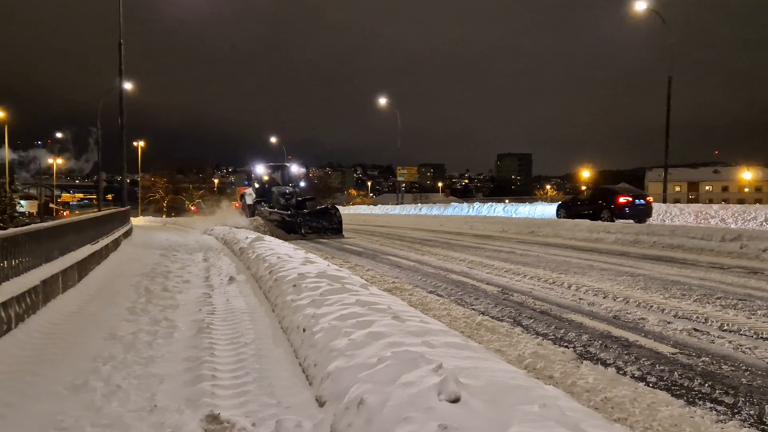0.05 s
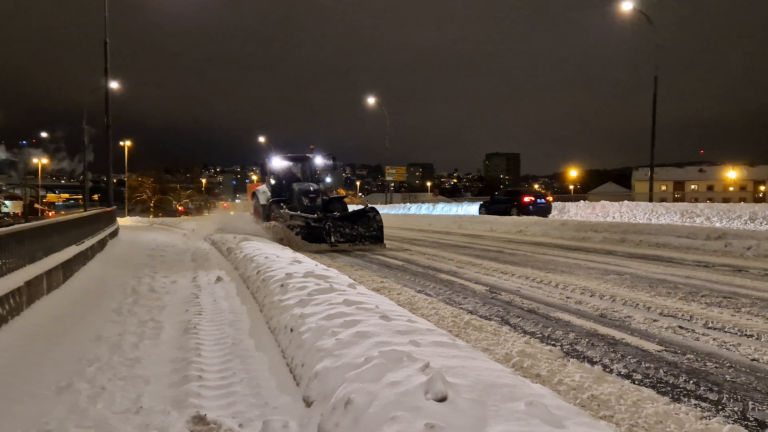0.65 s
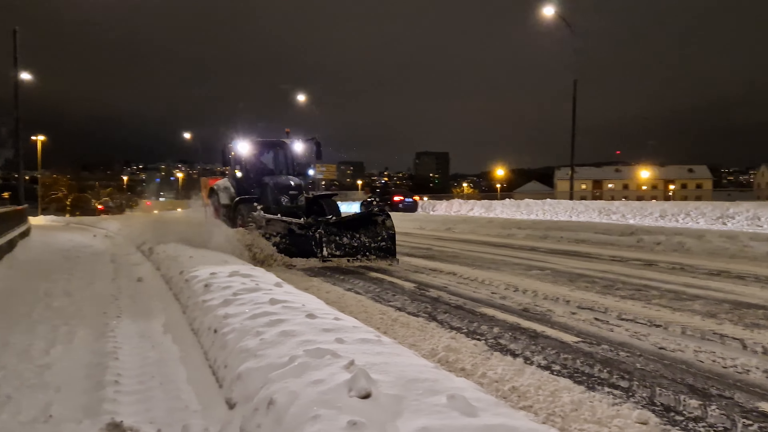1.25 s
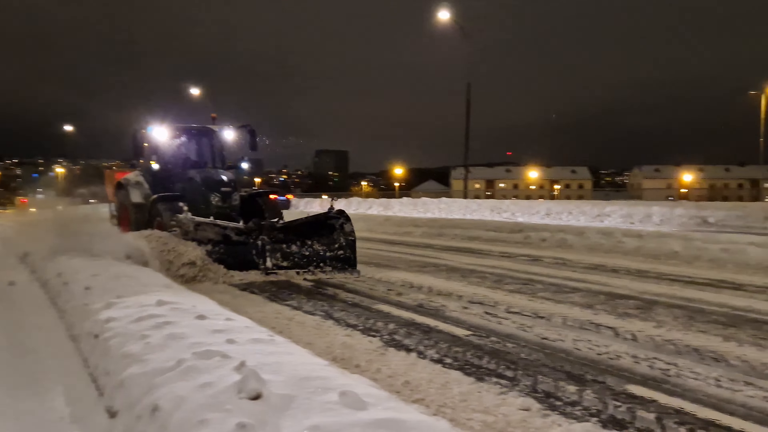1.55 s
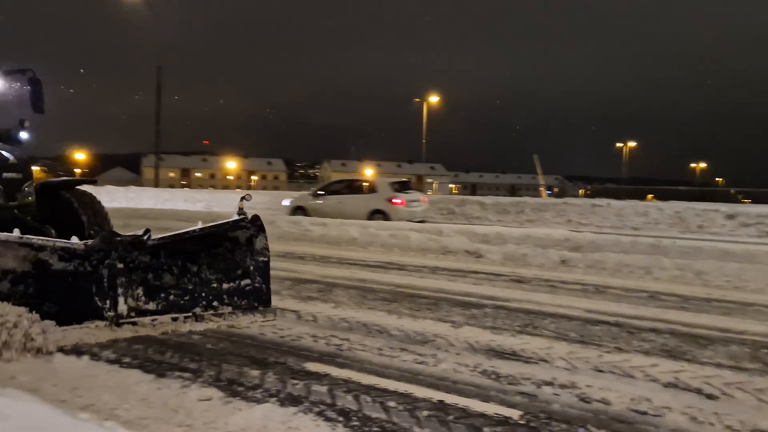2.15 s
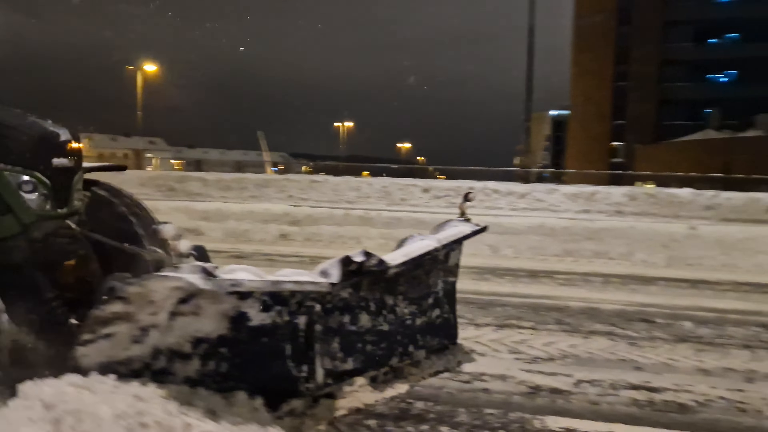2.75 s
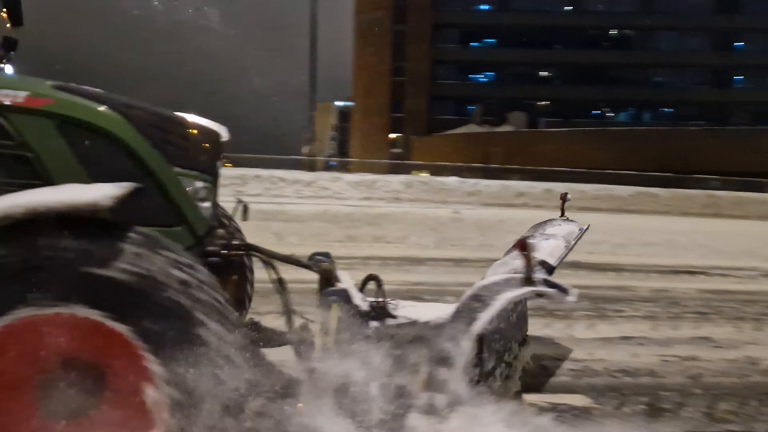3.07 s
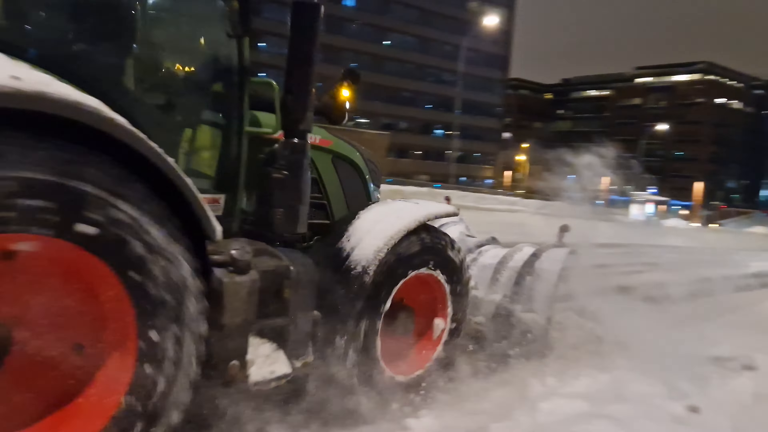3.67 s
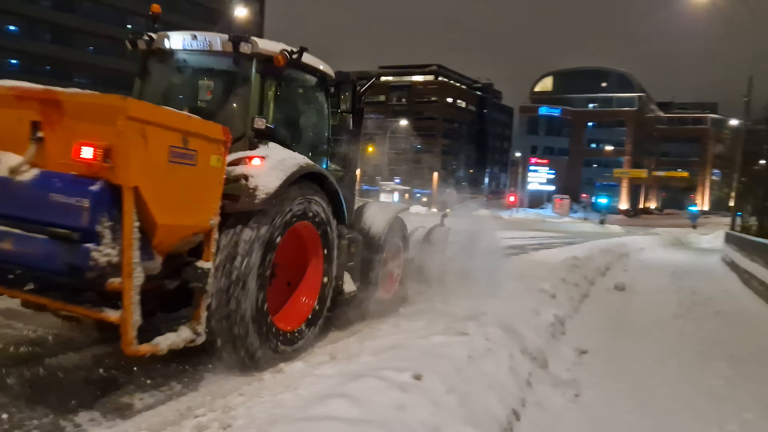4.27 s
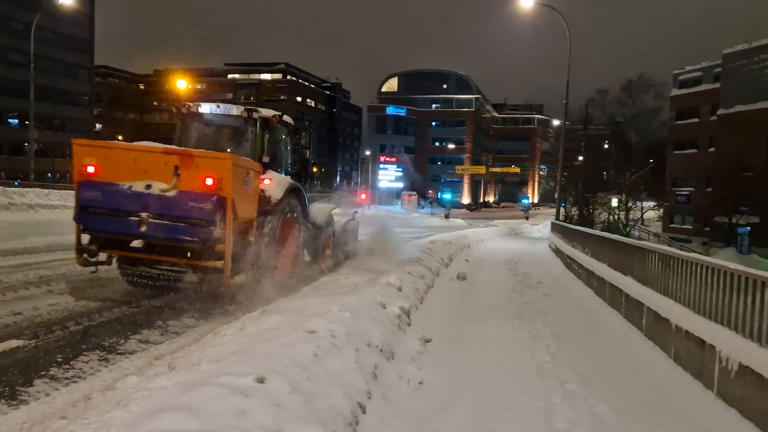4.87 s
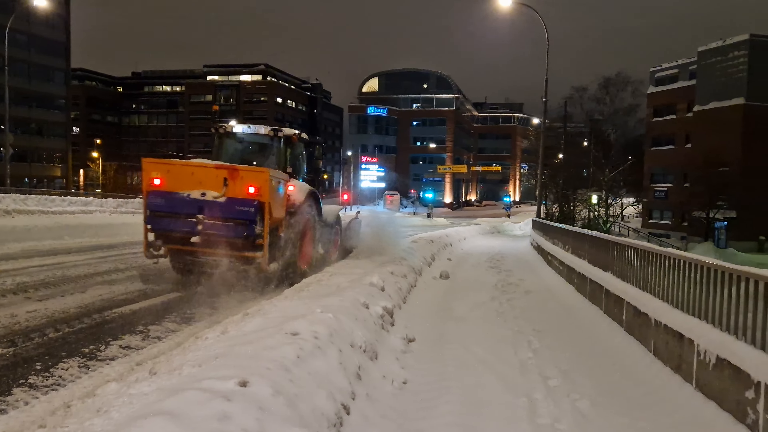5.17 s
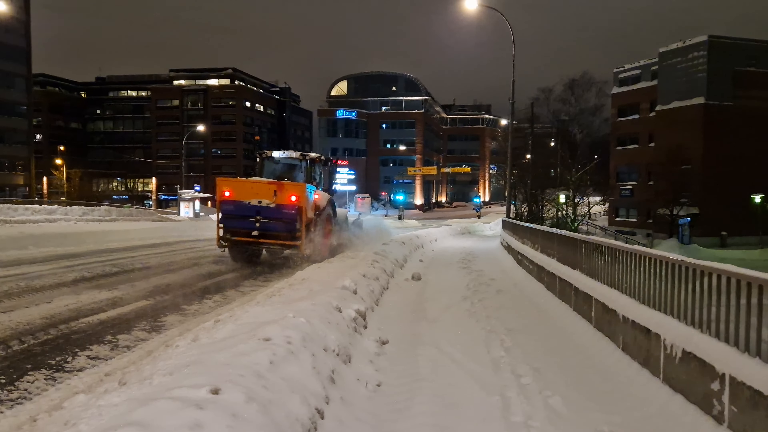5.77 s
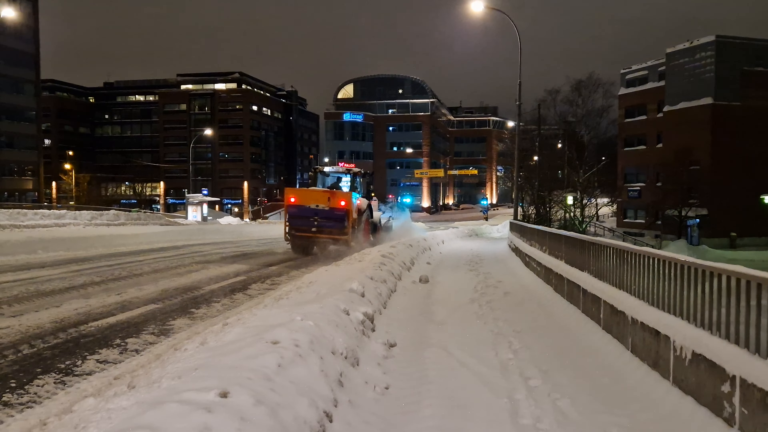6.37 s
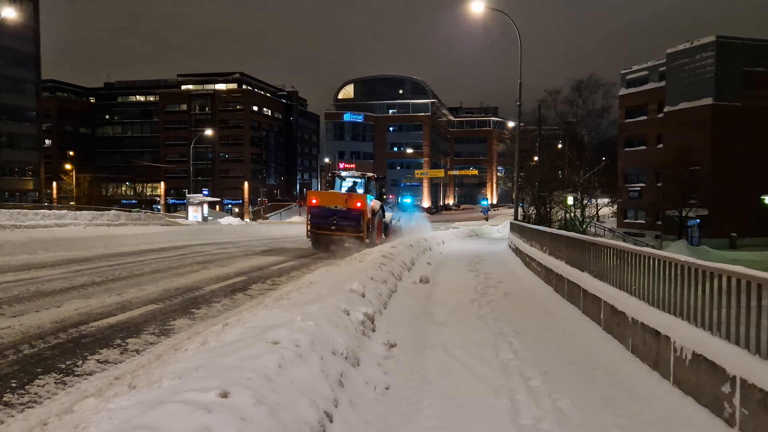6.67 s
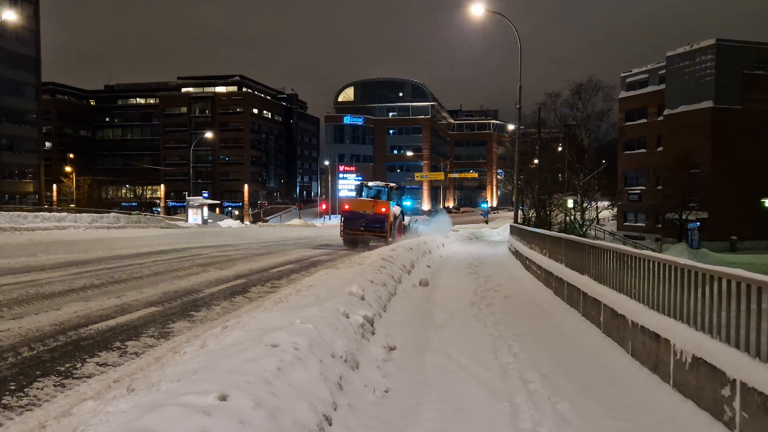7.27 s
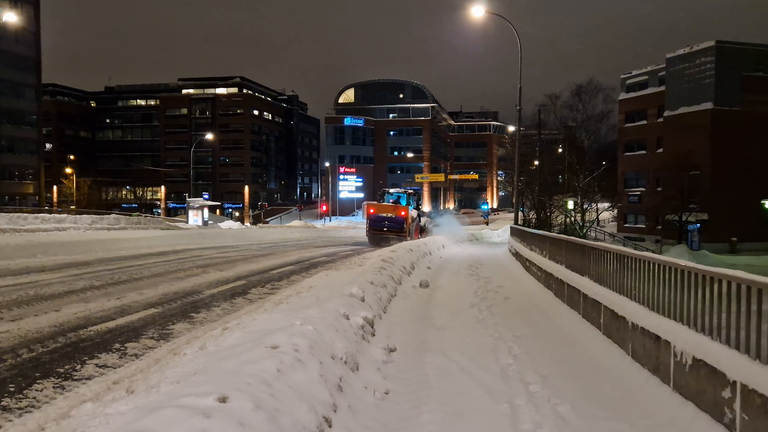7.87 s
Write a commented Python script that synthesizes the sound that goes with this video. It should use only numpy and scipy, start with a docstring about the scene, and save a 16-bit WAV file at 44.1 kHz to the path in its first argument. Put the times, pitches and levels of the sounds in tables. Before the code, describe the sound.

A diesel tractor passes close with its plough blade scraping and booming over packed snow, spraying snow, then draws away.

```python
"""A diesel tractor with a steel plough passes close by a stereo pair at the side of a snowy road.
On the approach the edge screeches and catches on ice, under a thin, sinking whistle.
Two to three seconds in it is closest: the blade judders and rasps over packed snow and booms at its own
resonance, lugged tyres rumble and thrown snow hisses. From about five seconds it draws away,
leaving the exhaust, the whine of the drive train and a far-off rumble."""
import sys
import numpy as np
from scipy import signal
from scipy.fft import rfft, irfft, next_fast_len
from scipy.io import wavfile
from scipy.ndimage import uniform_filter1d, minimum_filter1d, map_coordinates

SR = 44100
rng = np.random.default_rng(int(sys.argv[2]) if len(sys.argv) > 2 else 0)


def pcm_store(signal):
    """Save signal as 16-bit PCM."""
    levels = np.round(np.clip(np.atleast_2d(signal), -1, 1) * 32767)
    wavfile.write(sys.argv[1], SR, levels.astype(np.int16).T)


N = 349269
TIME = np.arange(N) / SR


def amp(db):
    """Decibels to gain."""
    return 10 ** (np.asarray(db) / 20)


def unit(x):
    """Scale to rms 1."""
    return x / np.sqrt(np.mean(x ** 2) + 1e-20)


def noise():
    """Two unrelated white noises."""
    return rng.standard_normal((2, N))


def along(points, hz):
    """Interpolate (f/Hz, value) points on a log frequency axis."""
    f, v = np.transpose(points)
    return np.interp(np.log(hz + 1), np.log(f + 1), v)


def curves(rows):
    """One value per sample for each column after the time."""
    s, *cols = np.transpose(rows)
    return [np.interp(TIME, s, c) for c in cols]


def wobble(rate):
    """A smooth random curve, rate knots a second."""
    steps = np.linspace(0, N / SR, N // 32)
    knots = rng.standard_normal(int(N * rate / SR) + 4)
    return np.interp(TIME, steps, map_coordinates(knots, [steps * rate]))


def spells(rows, ramp_s):
    """Gain in dB of (t/s, length/s, gain/dB) events that ramp in, hold and ramp out."""
    return sum(db * (np.tanh((TIME - s) / ramp_s) - np.tanh((TIME - s - length) / ramp_s)) / 2
               for s, length, db in rows)


def swells(rows, width_s):
    """Gain in dB of brief (t/s, gain/dB) events that swell and fade."""
    return sum(db * np.exp(-((TIME - s) / width_s) ** 2) for s, db in rows)


def passing(loudest_s, peak_db, round_s, rise_db_per_s, fall_db_per_s, far_db):
    """Roadside level in dB of a pass: a steady rise, a rounded peak, a fall to the far-off level."""
    away_s = np.hypot(TIME - loudest_s, round_s) - abs(round_s)
    db = peak_db - away_s * np.where(TIME < loudest_s, rise_db_per_s, fall_db_per_s)
    return 20 * np.log10(np.hypot(amp(db), amp(far_db)))


def filtered(x, response):
    """x times a response of frequency."""
    m = next_fast_len(N + SR // 2)
    return irfft(rfft(x, m) * response(np.fft.rfftfreq(m, 1 / SR)), m)[..., :N]


def shaped(x, spectrum):
    """x through a (f/Hz, gain/dB) curve."""
    return filtered(x, lambda hz: amp(along(spectrum, hz)))


def turning(pair, spectra, view):
    """Crossfade through the spectra, each at rms 1, as view goes 0, 1, 2."""
    return sum(np.maximum(1 - abs(view - k), 0) * unit(shaped(pair, spectrum))
               for k, spectrum in enumerate(spectra))


def grains(rate, scatter_db, bed_db):
    """Tiny random impacts of uneven size, rate a second, in a bed of countless weaker ones."""
    strikes = rng.random((2, N)) < rate / SR
    sizes = np.clip(noise() * amp(scatter_db * noise()), -3, 3)
    return unit(unit(strikes * sizes) + amp(bed_db) * noise())


def rippled(pair, depth_db):
    """Narrow patches of the spectrum swell and fade at random, rippling the noise."""
    bins = signal.stft(pair, nperseg=2048)[2]
    patches = uniform_filter1d(rng.standard_normal(bins.shape[1:]), size=2, axis=0)
    patches = uniform_filter1d(patches, size=18, axis=1)
    return signal.istft(bins * amp(depth_db * unit(patches)))[1][:, :N]


def ringing(drive, hz, width_hz, steady):
    """A resonance with a gliding centre, kept ringing by the drive; steady 0-1 evens out its swing."""
    turn = np.exp(2j * np.pi * np.cumsum(hz) / SR)
    pole = np.exp(-np.pi * width_hz / SR)
    swing = signal.lfilter([1 - pole], [1, -pole], drive / turn)
    swing = signal.lfilter([1 - pole], [1, -pole], swing)
    strength = uniform_filter1d(unit(abs(swing)), size=6000) + .1
    return unit((swing * turn).real / strength ** steady)


def tone(rows, width_hz):
    """A fuzzy note on a (t/s, f/Hz, level/dB) path, fading beyond its ends."""
    hz, db = curves(rows)
    outside_s = np.maximum(rows[0][0] - TIME, 0) + np.maximum(TIME - rows[-1][0], 0)
    return amp(db - 60 * outside_s) * ringing(noise(), hz, width_hz, steady=0.71)


# The side of the machine facing the microphones: t/s, view (0 = front, 1 = flank, 2 = rear)
VIEW = [(1.7, 0.18), (2.7, 0.94), (4.2, 1.09), (5.1, 1.16)]
def machine_view():
    """The machine is heard head on, then side on, then slightly from behind."""
    return curves(VIEW)[0]


# Brief flares of the whistle: t/s, gain/dB
WHISTLE_FLARES = [(.97, 4), (1.28, 10), (1.74, 7), (2.37, 1), (2.49, 4)]
def whistle():
    """A thin, flickering whistle sinks and grows on the approach, and dies as the machine draws level."""
    hz = 16320 - 1990 * TIME
    db = -65 + 3 * TIME - 90 * np.maximum(TIME - 2.55, 0)
    db = db + swells(WHISTLE_FLARES, width_s=0.061) + 3 * wobble(45)
    return amp(db) * ringing(noise(), hz, width_hz=300, steady=0.99)


# Firing rate and strength of the exhaust: t/s, f/Hz, level/dB
EXHAUST = [(0, 104.5, -43), (3.7, 104.4, -34), (5.3, 99.4, -65), (5.55, 97, -40.5), (6.2, 95.8, -41),
           (7.92, 92.1, -42.5)]
def exhaust():
    """Uneven firing throbs in six harmonics, fed to the centre signal only."""
    firing_hz, db = curves(EXHAUST)
    phase = 2 * np.pi * np.cumsum(firing_hz + 11 * wobble(30)) / SR
    pulses = unit(sum(amp(-14 * k) * np.sin((k + 1) * phase) for k in range(6)))
    return amp(db + 4.6 * wobble(12)) * pulses * [[1], [0]]


# Notes of the engine and drive train, each path: t/s, f/Hz, level/dB
APPROACH_GEARS = [
    [(.2, 914, -61), (1.2, 892, -35), (1.8, 894, -28)],
    [(1.3, 1166, -38), (1.75, 1156, -35), (2.15, 1175, -36.5)],
]  # two paths
DEPARTING_HUMS = [
    [(4.4, 240, -51), (5, 240, -45), (5.55, 227, -39.5), (6, 235, -58)],
    [(3.4, 409, -34), (4.5, 416, -40.5), (4.7, 414, -54), (5, 426, -35.5), (5.65, 404, -56),
     (5.88, 424, -42), (6.02, 398, -56), (7.9, 404, -44)],
]  # two paths
TRANSMISSION_GROWL = [(4.7, 700, -46), (5.05, 720, -40.5), (5.45, 740, -37.5), (5.8, 770, -49.5),
                      (6.15, 800, -41.5), (6.8, 800, -54)]
WHINE_LOW = [(5.3, 1348, -63), (5.75, 1371, -49), (6.1, 1385, -41), (6.4, 1408, -50), (6.85, 1428, -55)]
WHINE_HIGH = [(4.2, 1600, -65), (4.6, 1635, -48), (5.1, 1665, -60), (5.55, 1698, -53), (5.8, 1700, -52.5)]
def drive_train():
    """Gears whine coming up the road; going away, the engine hums and the drive growls and whines."""
    hums = sum(tone(path, width_hz=44) for path in DEPARTING_HUMS)
    growl = amp(2.4 * wobble(30)) * tone(TRANSMISSION_GROWL, width_hz=230)
    gears = sum(tone(path, width_hz=13.4) for path in APPROACH_GEARS)
    return hums + growl + gears + tone(WHINE_LOW, width_hz=34.6) + tone(WHINE_HIGH, width_hz=15)


# Snow passing the microphones: t/s, peak/dB, roundness/s, rise/(dB/s), fall/(dB/s), far level/dB
SPRAY_PASS = (2.5, -45, 1.74, 2.5, 5.5, -62)
POWDER_PASS = (2.5, -45, .5, 6, 5, -71.5)
# Full and thin loads off the blade: t/s, length/s, spray gain/dB, powder gain/dB
THROWS = [(1.288, 0.99, 2, 1.5), (2.69, 0.13, 5.5, 5), (2.9, 0.35, 1, 4), (3.24, 0.53, 3.5, 5),
          (3.74, 0.47, 2, 1), (4.45, 0.52, 2.5, 1), (5.95, 1.46, 5, -0.5)]
THIN_SNOW = [(0, 0.31, -9, -6.5), (2.32, 0.28, -2, -1)]
# Colour of the hiss, and the treble lost to distance: f/Hz, gain/dB
SPRAY_COLOUR = [(2180, -1.5), (3700, -2.5), (4520, -4.5), (5060, -1.5), (5990, 0.5), (6880, -8.5),
                (7400, -28), (9620, -52), (16300, -120)]
POWDER_FAR = [(4000, -70), (7000, -5), (7700, 1), (8500, -2.5), (9300, -2), (10600, -0.5), (11100, -18),
              (11900, -11), (13000, -5.5), (15700, -4.5)]
POWDER_NEAR = [(4120, -23), (7000, -1), (7440, 0), (8410, -5.5), (10300, -3), (12100, -4.5), (14200, -1),
               (15100, -1), (15700, -3.5)]
AIR_LOSS = [(9000, 0.5), (12500, -2)]
def thrown_snow():
    """Crumbs spray off the blade and tyres in clumps; the fine powder is brightest close by."""
    loads = np.array(THROWS + THIN_SNOW)
    spray_db = passing(*SPRAY_PASS) + spells(loads[:, [0, 1, 2]], ramp_s=0.09) + 0.12 * grip()
    powder_db = passing(*POWDER_PASS) + spells(loads[:, [0, 1, 3]], ramp_s=0.09)
    near = np.exp(-((TIME - 3) / 1.8) ** 2)
    far = np.interp(TIME, [5.4, 7.6], [0, 1])
    clumps_db = 0.64 * wobble(13) + wobble(75)
    crumbs = rippled(grains(2500, scatter_db=1.9, bed_db=4), depth_db=1.6)
    spray = amp(spray_db + clumps_db) * unit(shaped(crumbs, SPRAY_COLOUR))
    dust = rippled(grains(3000, scatter_db=1.5, bed_db=1), depth_db=1.8)
    powder = amp(powder_db + 0.41 * clumps_db) * turning(dust, [POWDER_FAR, POWDER_NEAR], near)
    return spray + (1 - far) * powder + far * shaped(powder, AIR_LOSS)


# Wheels passing the microphones: t/s, peak/dB, roundness/s, rise/(dB/s), fall/(dB/s), far level/dB
RUMBLE_PASS = (2.5, -27.5, -1.64, 2.5, 8.5, -35.5)
LUGS_PASS = (1.7, -21.5, 0.5, 20, 16, -58)
# Colour of the rumble from ahead and behind: f/Hz, gain/dB
RUMBLE_AHEAD = [(15, -47), (25, -19), (55, -2), (85, -2.5), (140, -5), (180, -7), (250, -11.5), (450, -120)]
RUMBLE_BEHIND = [(15, -42), (25, -16), (50, 4.5), (100, 1.5), (140, 0.5), (175, -14), (260, -11),
                 (500, -120)]
# Rough and smooth stretches of road: t/s, length/s, gain/dB
RUTS = [(0, 0.11, 0.5), (.93, 1.04, 7.5), (3.02, 0.51, 2.5), (3.55, 0.996, 7.5), (4.97, 0.051, 4.5),
        (7.1, 0.65, 6.5)]
SMOOTH_ROAD = [(0.135, 0.23, -7), (5.06, 0.47, -4.5), (5.738, 0.5, -3)]
# The tread note: f ahead/Hz, f behind/Hz, t midway/s, glide/s
LUG_GLIDE = (57.1, 48.7, 1.9, 1.6)
def tyres():
    """Wheels and frame rumble on packed snow; the tread lugs beat out a low note that sinks in passing."""
    behind = np.clip((TIME - 4.5) / 1.2, 0, 1)
    rumble = turning(grains(150, scatter_db=1, bed_db=10), [RUMBLE_AHEAD, RUMBLE_BEHIND], behind)
    rumble_db = passing(*RUMBLE_PASS) + spells(RUTS + SMOOTH_ROAD, ramp_s=0.013)
    ahead_hz, behind_hz, midway_s, glide_s = LUG_GLIDE
    lug_hz = behind_hz + (ahead_hz - behind_hz) * (1 - np.tanh((TIME - midway_s) / glide_s)) / 2
    lugs = ringing(noise(), lug_hz, width_hz=5, steady=0.9)
    return amp(rumble_db) * rumble + amp(passing(*LUGS_PASS)) * lugs


# The edge catches on ice: t/s, relative level/dB
ICE_CATCHES = [(0.405, -18), (0.698, -11.5), (0.839, -16.5), (0.947, -18), (1.003, -12.5), (1.1936, -11),
               (1.2866, -9), (1.498, -14), (2.071, -16)]
# Loose linkage: t/s, f/Hz, level/dB
LINKAGE_CLINKS = [(2.055, 3400, -39), (2.83, 4970, -42), (3.01, 3600, -39)]
def knocks():
    """Ice ridges crack under the edge on the approach, and the linkage rattles close by."""
    def burst(s, db, t60):
        """A 2 ms attack, dying by 60 dB in t60 seconds."""
        return np.clip((TIME - s) / .002, 0, 1) * amp(db - 60 * abs(TIME - s) / t60)

    crack_level = sum(burst(s, db - 10, t60=0.27) for s, db in ICE_CATCHES)
    cracks = crack_level * unit(shaped(noise(), RASP_AHEAD))
    rattles = sum(burst(s, db, t60=0.16) * ringing(noise(), np.full(N, hz), width_hz=220, steady=0)
                  for s, hz, db in LINKAGE_CLINKS)
    return cracks + rattles


# Resonance of the blade: t/s, f/Hz
BOOM_PITCH = [(0, 214), (.6, 222), (1, 215), (1.4, 226), (2.2, 222), (2.7, 211), (3.2, 210), (3.45, 222),
              (3.85, 210), (4.5, 227)]
# Its boom between ridges: t/s, level/dB
BOOM_LEVEL = [(0, -36.5), (.5, -27), (1, -24.5), (1.55, -19.5), (2.1, -20.5), (2.8, -20.5), (3.2, -20.5),
              (3.55, -27.5), (4.5, -41), (5.4, -59)]
# The blade drops over a ridge: t/s, gain/dB
RIDGE_BUMPS = [(.334, 6), (.472, 3), (.848, 8), (1.376, 13), (1.506, 9.5), (1.605, 5.5), (1.76, 3.5),
               (1.84, 8), (1.914, 9), (1.955, 7.5), (2.123, 15.5), (2.282, 9), (2.355, 5), (2.468, 6),
               (2.905, 7.5), (2.98, 7), (3.22, 0.5), (3.345, 3.5), (3.434, 6), (4.44, 14), (4.485, 13)]
# The blade lifts: t/s, drop/dB
BLADE_LIFTS = [(.14, 5), (.435, 15), (.671, 8), (.798, 11), (1.243, -1), (1.703, 21), (1.997, 10),
               (2.32, 27), (3.259, 14)]
def boom():
    """The blade hums on one firm resonance, swelling at ridges and stalling as it lifts."""
    jolts_db = swells(RIDGE_BUMPS, width_s=.02) - swells(BLADE_LIFTS, width_s=0.012)
    db = curves(BOOM_LEVEL)[0] + jolts_db + 1.8 * wobble(45)
    hz = curves(BOOM_PITCH)[0]
    wander_hz = 5.5 * np.array([wobble(26), wobble(25.75)])
    hum = unit(np.sin(2 * np.pi * np.cumsum(hz + wander_hz, axis=1) / SR))
    rattle = ringing(grains(200, scatter_db=0.81, bed_db=0), hz, width_hz=48.5, steady=0.98)
    return amp(db) * (hum + amp(-1.5) * rattle)


# The edge digs into packed snow: t/s, length/s, gain/dB
EDGE_BITES = [(.98, 0.15, 3), (1.16, 0.15, 2.5), (1.47, 0.073, 1.5), (1.76, 0.16, 0), (2.57, 0.37, 2),
              (2.93, 0.24, 1), (3.33, 0.14, 7), (4.92, 0.43, -1)]
# The edge rides up: t/s, length/s, drop/dB
EDGE_SKIPS = [(.04, 0.21, 2), (.76, 0.058, 8.5), (1.63, 0.12, 2), (1.97, 0.29, 4), (2.33, 0.21, 7),
              (3.09, 0.29, 5), (4.66, 0.25, 3)]
def grip():
    """How hard the edge presses on the snow, in dB about its usual load."""
    return spells(EDGE_BITES, ramp_s=0.04) - spells(EDGE_SKIPS, ramp_s=0.04)


# Blade passing the microphones: t/s, peak/dB, roundness/s, rise/(dB/s), fall/(dB/s), far level/dB
SCRAPE_PASS = (2, -16.5, 1, 12, 10, -39.5)
RASP_PASS = (1.21, -27.5, 0.7, 12, 4.5, -49.5)
# Colour of the low scrape and the higher rasp from three sides: f/Hz, gain/dB
SCRAPE_AHEAD = [(150, -10.5), (245, -1.5), (265, -9.5), (350, -8.5), (450, -10.5), (530, -5.5), (590, -7.5),
                (651, -1), (723, -5.5), (784, -3), (1000, -22.5), (1300, -24), (2200, -120)]
SCRAPE_BESIDE = [(150, -60), (250, -6), (305, -3.5), (350, -5), (398, -1.5), (507, -2.5), (655, -6),
                 (810, -4.5), (1000, -15.5), (1300, -59), (2200, -120)]
SCRAPE_BEHIND = [(100, -67), (200, -20), (310, -24), (410, -1), (470, -11.5), (540, -4), (660, 9),
                 (790, -6), (890, 6), (980, -34), (1300, -49), (2500, -120)]
RASP_AHEAD = [(560, -60), (950, -5.5), (1180, 0), (1400, -0.5), (1520, -5.5), (1690, -5), (2000, -12),
              (2280, -11), (2500, -22.5), (3130, -19), (3610, -23), (3900, -34), (5070, -31), (8580, -120)]
RASP_BESIDE = [(560, -47), (950, -6.5), (1060, -0.5), (1600, -1), (1950, -14.5), (2220, -12.5), (2670, -37),
               (3060, -20), (3900, -33.5), (5070, -46), (8580, -120)]
RASP_BEHIND = [(300, -73), (700, -22), (980, -36), (1150, -30), (1400, 2), (1600, -15), (1850, -10),
               (2200, -7), (2480, -13), (3050, -6.5), (3650, -13.5), (5000, -17), (8000, -120)]
# Notes of the cutting edge: t/s, f/Hz, level/dB
EDGE_CHATTER = [(.4, 640, -45), (.72, 638, -31), (1.3, 642, -27.5), (1.7, 636, -26), (2.05, 620, -26.5),
                (2.22, 590, -17), (2.4, 557, -31), (2.8, 510.5, -27.5), (3.3, 447, -40.5)]
ICE_SCREECH = [(.25, 1380, -48), (.5, 1450, -33.5), (.72, 1390, -31), (1.05, 1340, -46)]
# A low drone that sinks as the machine passes: t/s, f/Hz, level/dB
SINKING_DRONE = [(.9, 145, -33), (1.6, 160, -21.5), (2.2, 167, -40), (2.7, 160, -22), (2.95, 166, -26),
                 (3.08, 139, -20.5), (3.4, 138.5, -21), (3.8, 126, -28), (4.3, 125.5, -27.5)]
def blade():
    """The steel edge sticks and slips, ringing the blade and grinding the snow, over a low drone."""
    view = machine_view()
    judder = np.interp(view, [0, 2], [1, .35]) * (0.47 * wobble(35) + wobble(95))
    scrape_db = passing(*SCRAPE_PASS) + 0.79 * grip() + 0.68 * judder
    rasp_db = passing(*RASP_PASS) + grip() + 1.8 * judder
    grind = rippled(grains(700, scatter_db=1, bed_db=5), depth_db=2.5)
    scrape = amp(scrape_db) * turning(grind, [SCRAPE_AHEAD, SCRAPE_BESIDE, SCRAPE_BEHIND], view)
    grit = rippled(grains(1500, scatter_db=1.4, bed_db=5.2), depth_db=2.5)
    rasp = amp(rasp_db) * turning(grit, [RASP_AHEAD, RASP_BESIDE, RASP_BEHIND], view)
    steel = boom() + tone(EDGE_CHATTER, width_hz=31)
    drone = tone(SINKING_DRONE, width_hz=24.4)
    return scrape + rasp + steel + drone + tone(ICE_SCREECH, width_hz=280)


# Stereo width at the microphones: f/Hz, side minus centre/dB
WIDTH_AHEAD = [(60, -11), (200, -22), (700, -13), (1600, -9), (3000, -2.5), (9000, 1)]
WIDTH_BESIDE = [(60, -23), (200, -23), (750, -13), (1300, -3), (2500, -4), (9000, 0.5)]
WIDTH_BEHIND = [(70, 4.5), (400, 2), (800, 2), (1100, 14), (1500, -22), (6000, -18), (9000, -1)]
def diffuse(pair):
    """Centre and side from a pair: the machine is wide up close; far off, road and railing scatter it."""
    view = machine_view()
    side = sum(np.maximum(1 - abs(view - k), 0) * shaped(pair[1], width)
               for k, width in enumerate([WIDTH_AHEAD, WIDTH_BESIDE, WIDTH_BEHIND]))
    return pair[0], side


# Where the sound seems to come from: t/s, bearing (1 = left, -1 = right)
BEARING = [(0, 0.46), (1.3, -0.032), (2.2, 1), (3.2, -0.65), (4.1, 0.12), (4.8, 0.72), (6, 0.34),
           (7.5, -0.43)]
# Side signal from reaching one microphone first, at full bearing: f/Hz, gain/dB
ARRIVAL_LEAD = [(600, -18), (1400, 1), (3000, 2.5), (6000, 4.5), (10000, -26)]
# Balance of the microphones: f/Hz, left minus right/dB
BALANCE = [(100, 0.56), (900, 0.5), (1800, 1.5), (2250, 6), (2700, 1), (5500, 4.5), (9000, -1),
           (14000, 5.5)]
def scene():
    """The machine's sound swings across two microphones; its mid treble reaches the nearer one first."""
    machine = tyres() + blade() + knocks() + thrown_snow() + exhaust() + drive_train() + whistle()
    mid, side = diffuse(machine)
    # a small lead in time puts a quarter-turned copy of the centre into the side
    lead = filtered(mid, lambda hz: 1j * amp(along(ARRIVAL_LEAD, hz)))
    side = side + curves(BEARING)[0] * lead
    left = filtered(mid + side, lambda hz: amp(along(BALANCE, hz) / 2))
    right = filtered(mid - side, lambda hz: amp(-along(BALANCE, hz) / 2))
    return np.array([left, right])


def record(dry):
    """The roadside phone eases its gain down on the highest peaks and cuts all above its band limit."""
    ceiling, top_hz = .97, 15800
    window = int(.01 * SR)
    needed = np.minimum(1, ceiling / (abs(dry).max(axis=0) + 1e-9))
    gain = uniform_filter1d(minimum_filter1d(needed, size=2 * window), size=window)
    return filtered(dry * gain, lambda hz: hz < top_hz)


dry = scene()
out = record(dry)
pcm_store(out)
```